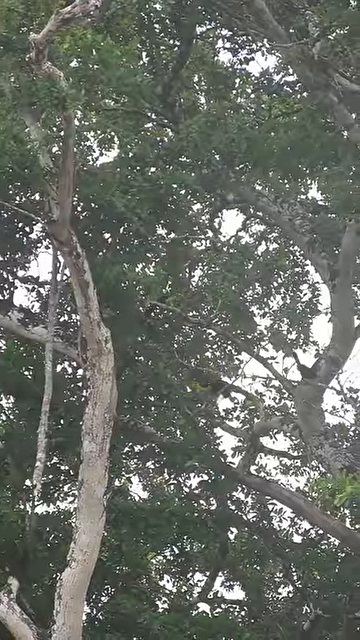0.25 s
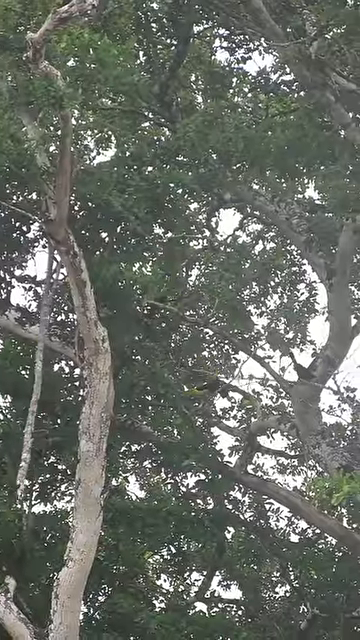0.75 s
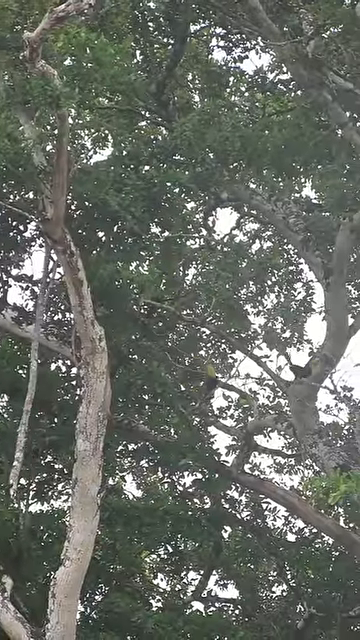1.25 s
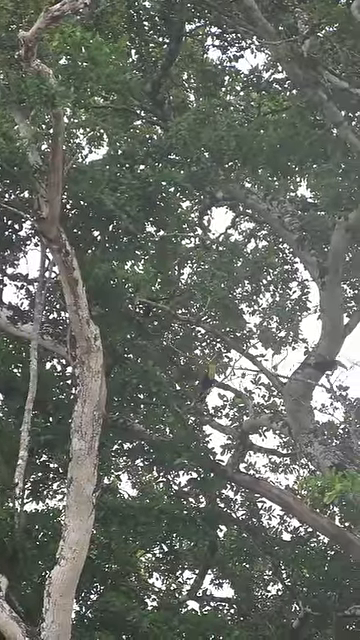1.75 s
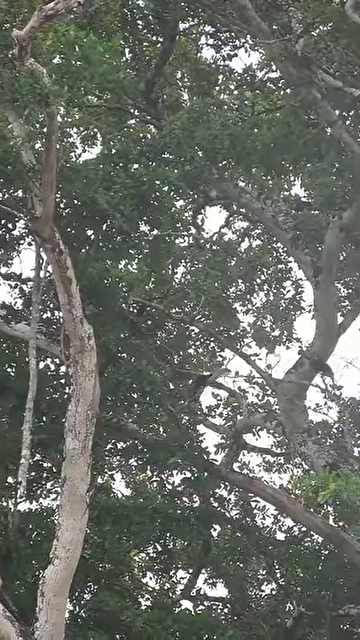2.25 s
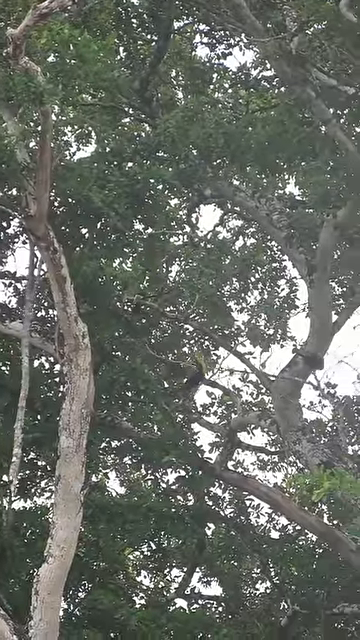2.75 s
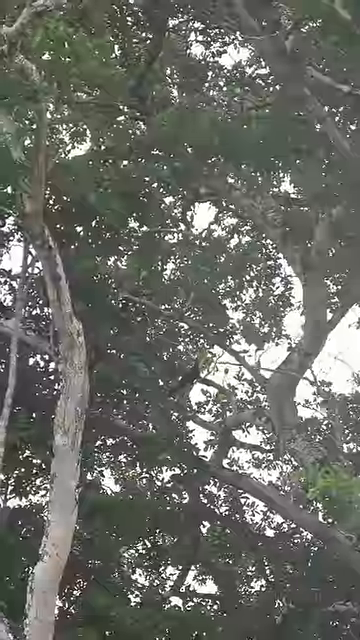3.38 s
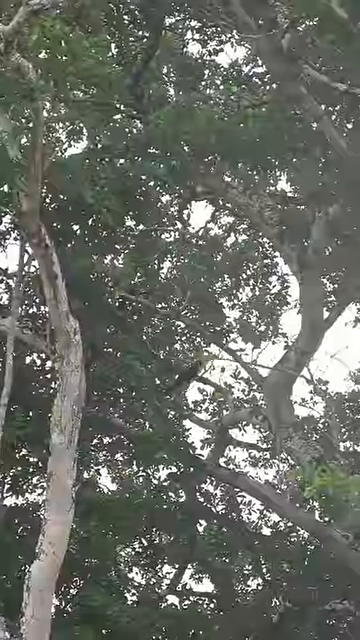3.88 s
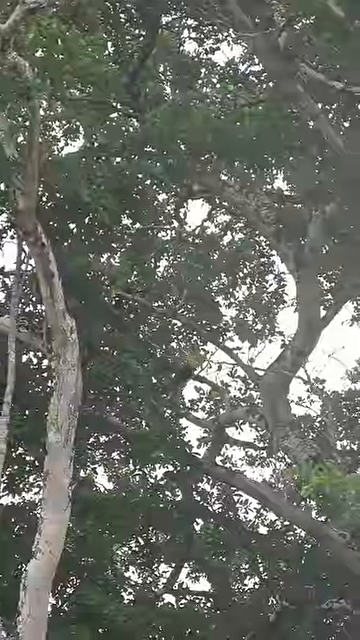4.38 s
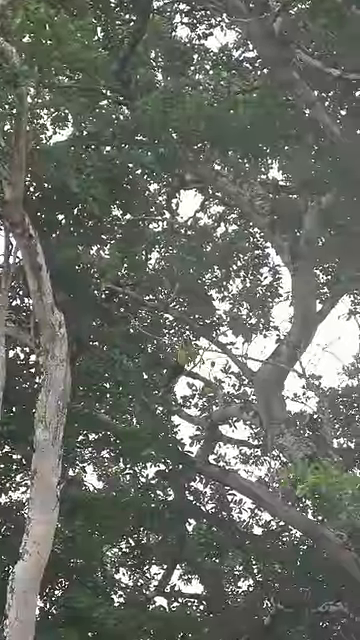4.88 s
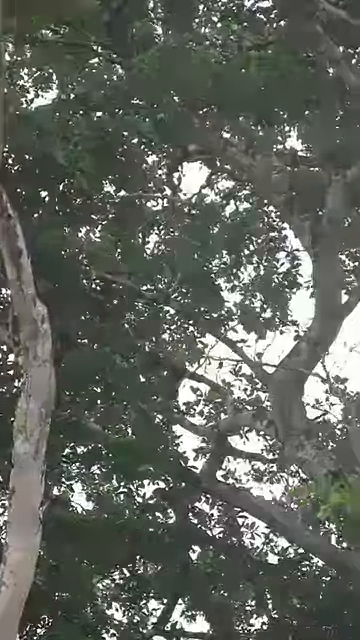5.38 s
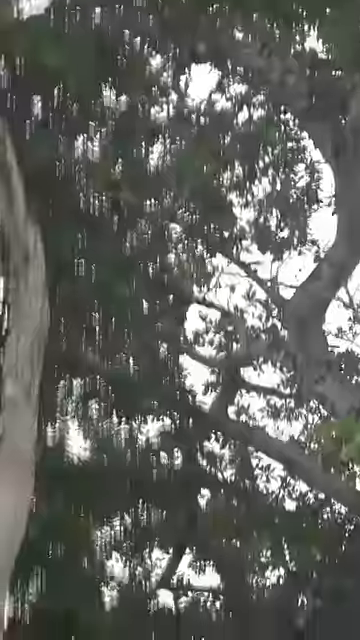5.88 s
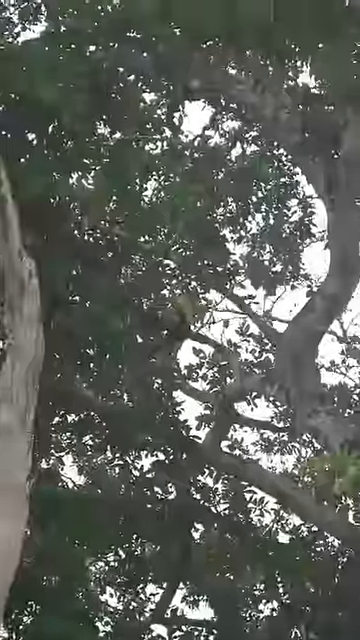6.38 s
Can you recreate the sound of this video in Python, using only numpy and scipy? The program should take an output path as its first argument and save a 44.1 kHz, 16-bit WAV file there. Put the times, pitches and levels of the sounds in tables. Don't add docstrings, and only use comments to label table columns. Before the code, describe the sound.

Several large tropical birds trade hoarse, rattling croaks high in a forest tree, over hiss and faint whistles; late handling clicks interrupt.

```python
import sys
import numpy as np
from scipy import signal
from scipy.fft import rfft, irfft, next_fast_len
from scipy.io import wavfile
from scipy.ndimage import uniform_filter1d, map_coordinates

SR = 44100
rng = np.random.default_rng(int(sys.argv[2]) if len(sys.argv) > 2 else 0)


def volts(x):
    e = np.asarray(x, float) / 20
    return 10 ** e


def dump(signal):
    limited = np.clip(np.atleast_2d(signal).T, -1, 1)
    pcm = np.round(limited * 32767).astype(np.int16)
    wavfile.write(sys.argv[1], SR, pcm)


N = 293246

# centre in Hz, width in Hz, level in dB.
SHELL = [(880, 720, -6), (1247, 63, 4), (1420, 96, 1), (1720, 420, 1.5), (2585, 88, 5), (3800, 3300, -3.5)]


def unit(x):
    return x / np.sqrt(np.mean(x ** 2) + 1e-20)


def along(points, hz):
    f, v = np.transpose(points)
    return np.interp(np.log(hz + 1), np.log(f + 1), v)


def curves(rows, t):
    s, *cols = np.transpose(rows)
    return [np.interp(t, s, c) for c in cols]


def wobble(rate_hz, size):
    knots = rng.standard_normal(int(size * rate_hz / SR) + 4)
    return map_coordinates(knots, [np.arange(size) * rate_hz / SR + 1])


def filtered(x, response):
    m = next_fast_len(x.shape[-1] + 8192)
    return irfft(rfft(x, m) * response(np.fft.rfftfreq(m, 1 / SR)), m)[..., :x.shape[-1]]


def modes(resonances):
    def response(f):
        total = 0
        for k, (centre_hz, width_hz, db) in enumerate(resonances):
            band = 1j * f * width_hz
            total = total + (-1) ** k * volts(db) * band / (centre_hz ** 2 - f * f + band)
        return total
    return response


def hiss(spectrum):
    return unit(filtered(rng.standard_normal(N), lambda hz: volts(along(spectrum, hz))))


def add(track, s, sound):
    part = track[..., max(round(s * SR), 0):][..., :sound.shape[-1]]
    part += sound[..., :part.shape[-1]]


def background():
    # Hz, dB per Hz; hiss alike in both ports, then opposite in them, then the chorus.
    air_mid = [(12, -46), (20, -8), (119, -7), (384, -4.5), (429, -3), (507, -6.5), (617, -4), (1880, -3.5),
               (2560, -6.5), (3670, -14), (6780, -13.5), (15600, -28.5)]
    air_side = [(12, -55), (20, -5), (537, -6), (671, -4.5), (1380, -8), (1680, -10), (2350, -12),
                (5280, -19), (15600, -34.5)]
    chorus_tone = [(2000, -21), (2500, 2.5), (3200, 1), (4100, 2), (4900, -12), (5600, -31)]
    # time in seconds, chorus level in dB.
    chorus = [(0, -48), (.3, -52), (.9, -54), (1.45, -51), (1.75, -51), (2.35, -51), (2.96, -47),
              (3.45, -59.5), (4.2, -56.5), (4.75, -58.5), (5.55, -65), (5.75, -52.5), (6.2, -51.5),
              (6.65, -53.5)]
    # centre in Hz, width in Hz, level in dB.
    insects = [(6800, 260, -67), (9300, 800, -67)]
    # mains line in Hz, level in dB rms.
    hum = [(59.2, -68), (118.4, -67), (600, -65.5)]
    t = np.arange(N) / SR
    chorus_db, = curves(chorus, t)
    mid = volts(-52.5) * hiss(air_mid)
    mid += volts(chorus_db + wobble(18, size=N)) * hiss(chorus_tone)
    for hz, width_hz, db in insects:
        band = filtered(rng.standard_normal(N), lambda f: np.exp(-((f - hz) / width_hz) ** 2))
        mid += volts(db) * unit(band)
    for hz, db in hum:
        phase = 2 * np.pi * hz * t + 0.34 * wobble(11, size=N)
        mid += volts(db + 0.41 * wobble(3.8, size=N)) * np.sin(phase)
    return mid, volts(-45.0) * hiss(air_side)


def train(first_s, last_s, db, hz, second_db, gap_s, voice, growth_ms=0):
    ms, start_pitch, third_db = voice
    count = round((last_s - first_s) / gap_s) + 1
    left = np.linspace(1, 0, count) if count > 1 else [0]
    scatter_db = 0.8 * rng.standard_normal((count, 3))
    notes = []
    for k, (u, c) in enumerate(zip(left, scatter_db)):
        s = last_s - u * (last_s - first_s)
        note_db = db - 2.5 * u ** 2 + c[0]
        note_ms = ms + growth_ms * (k + 1)
        notes.append((s, note_db, hz * start_pitch ** u, note_ms, second_db + 2 * c[1], third_db + 2 * c[2]))
    return notes


def low_notes():
    # first click in seconds, last click in seconds, held tone in ms, level in dB, pitch in Hz.
    croaks = [(0.417, 0.446, 50.5, -30, 1642), (0.969, .991, 50, -31, 1645), (1.254, 1.277, 9.5, -29, 1610),
              (1.544, 1.582, 10, -32, 1666), (1.597, 1.597, 23, -28.5, 1956),
              (1.817, 1.839, 30, -35.5, 1632), (2.08, 2.104, 55.5, -35, 1598), (2.43, 2.469, 3, -39, 1620),
              (2.636, 2.68, 56, -35, 1639), (3.042, 3.074, -10, -34, 1745), (3.199, 3.233, -9, -33, 1640),
              (3.756, 3.783, -1, -33.5, 1680), (3.814, 3.836, 27.5, -33, 1632),
              (4.332, 4.35, 42.5, -35.5, 1596), (4.928, 4.928, 50.5, -31.5, 1598),
              (5.517, 5.533, 10, -30.5, 1633), (6.024, 6.049, 70, -34, 1578),
              (6.591, 6.632, 11.5, -34, 1664)]
    # time in seconds, level in dB, pitch in Hz, 2nd overtone in dB.
    clucks = [(.008, -35.5, 1750, -20), (.032, -32.5, 1710, -23), (.107, -35.5, 1550, -20),
              (.398, -33.5, 1610, -12), (.554, -29.5, 1850, -20), (.732, -35, 1595, -28),
              (1.068, -28, 1767, -9), (1.35, -36, 1620, -5), (1.505, -38.5, 1650, 1),
              (3.101, -30, 1595, -17), (3.273, -30.5, 1650, -16), (3.341, -37, 1600, -6),
              (3.702, -34, 1660, -12), (3.915, -34.5, 1670, -3), (3.949, -36.5, 1750, -4),
              (4.877, -36.5, 1530, -11), (4.898, -37.5, 1750, 1), (1.192, -33, 1670, -2),
              (1.172, -39.5, 1570, 0), (0.429, -33.5, 1600, -21), (.585, -38, 1720, -1),
              (.603, -40, 1680, 1), (.626, -40, 1750, -15), (0.645, -34.5, 1800, -18),
              (.685, -34.5, 1940, -6), (1.644, -44, 1960, -12), (1.833, -35, 1720, -3),
              (1.863, -49, 1670, 1), (1.884, -38, 1650, -2), (1.908, -39, 1750, 2), (2.086, -40.5, 1720, 2),
              (2.104, -42, 1670, 2), (2.138, -36.5, 1590, -18), (1.816, -44, 1660, 2),
              (2.196, -36, 1960, -2), (4.417, -40, 1620, -10), (4.426, -37, 1620, -5),
              (4.436, -34, 1700, -7), (4.908, -34.5, 1800, 2.5), (5.453, -38, 1690, -3),
              (5.545, -33.5, 1580, -3), (6.175, -39, 1780, -2), (5.095, -53, 1540, -4),
              (5.484, -36, 1510, -29), (5.566, -31, 1947, -5), (5.609, -40, 1653, -10),
              (5.999, -43, 1570, 2), (6.069, -32, 1790, -1.5), (6.573, -41, 1610, -17)]
    # first note in seconds, last note in seconds, level in dB, pitch in Hz.
    shrill = [(0.383, .408, -48, 1720), (0.522, .547, -36.5, 1765), (1.191, 1.216, -42, 1650),
              (2.574, 2.574, -39.5, 1650), (3.231, 3.257, -37, 1768), (3.212, 3.212, -45.5, 1720),
              (3.762, 3.786, -48, 1840), (3.893, 3.893, -42.5, 1616), (6.112, 6.134, -53, 1580)]
    # note ms, first pitch over last, 3rd overtone dB
    click_voice, shrill_voice = (6, 0.97, -21), (11, 0.99, 0.99)
    click_gap_s, shrill_gap_s, hold_lag_s = 0.021, 0.024, 0.014
    notes = []
    for first_s, last_s, held_ms, db, hz in croaks:
        growth_ms = 0.03 * held_ms
        notes += train(first_s, last_s, db, hz * 0.98, -12.5, click_gap_s, click_voice, growth_ms)
        if held_ms > 10:
            middle_s = last_s + hold_lag_s + held_ms / 2000
            notes.append((middle_s, db - 2, hz, held_ms, -5, -15))
    for s, *note in clucks:
        notes += train(s, s, *note, click_gap_s, click_voice)
    for row in shrill:
        notes += train(*row, 3, shrill_gap_s, shrill_voice)
    return notes


def high_notes():
    # first note in seconds, last note in seconds, level in dB, pitch in Hz, 2nd overtone in dB.
    yelps = [(.052, .064, -35, 1974, -2.5), (0.653, 0.693, -38.5, 1932, 2.5), (1.079, 1.099, -35, 2070, 1),
             (1.125, 1.15, -38, 1900, -7), (1.22, 1.247, -36, 2035, -8), (1.286, 1.307, -34.5, 1850, -6),
             (1.318, 1.318, -41.5, 1950, 3), (2.449, 2.449, -42, 1894, -6), (2.469, 2.469, -40.5, 1800, -7),
             (1.525, 1.555, -40.5, 1882, -2), (1.865, 1.9, -40.5, 2260, -17), (1.863, 1.905, -37, 1845, -7),
             (1.914, 1.938, -32.5, 1920, -7), (2.18, 2.2, -36.5, 1960, -6), (2.489, 2.541, -33, 1895, -2.5),
             (2.758, 2.779, -37.5, 2000, -3), (3.111, 3.143, -34.5, 1980, -17),
             (3.081, 3.081, -39, 1900, -9), (3.167, 3.167, -36, 1950, -8), (3.194, 3.214, -38.5, 1910, -6),
             (3.241, 3.241, -34, 1860, -17), (3.27, 3.283, -35.5, 1916, -18),
             (3.295, 3.306, -40.5, 1940, -20), (3.762, 3.8, -36.5, 1955, -5.5),
             (3.872, 3.884, -35.5, 1970, -8), (3.918, 3.928, -37, 2080, -2.5),
             (4.451, 4.461, -33, 2032, -10), (4.813, 4.83, -42, 1918, -3.5), (5.0, 5.02, -39.5, 2024, -5),
             (5.447, 5.479, -36.5, 1920, -11), (6.132, 6.146, -35, 1980, -2)]
    gap_s, voice = 0.011, (7.5, 0.98, -25)
    return [note for row in yelps for note in train(*row, gap_s, voice)]


def syrinx(notes, glide, rough, flutter_hz, chop, rasp_db):
    # Hz, dB per Hz.
    throat = [(1280, -40), (1480, -1), (2050, 0), (2500, -8), (3400, -4), (4300, -5), (5400, -13),
              (7500, -34)]
    lean_s = 0.0015
    out, puffs = np.zeros(N), np.zeros(N)
    t = np.arange(-2600, 2600) / SR
    for s, db, hz, ms, second_db, third_db in notes:
        reach_s = max(ms, 5.5) * 0.00062
        late = np.clip(t / reach_s, -1, 1) * min(ms / 40, 1)
        leaned = t + lean_s / 2
        side_s = reach_s + lean_s * np.sign(leaned)
        swell = volts(db + late) * np.exp(-np.abs(leaned / side_s) ** (2 + ms / 18))
        turn = 2 * np.pi * hz * (t + glide * t * t / 2)
        turn = turn + rough * wobble(156.4, size=len(t)) + rng.uniform(0, 2 * np.pi)
        flutter = np.cos(2 * np.pi * flutter_hz * rng.uniform(0.87, 1.19) * t)
        jitter = wobble(322.4, size=len(t))
        chopped = (1 + 0.7 * flutter) * volts(4 * late)
        tone = (1 + chop * flutter) * np.sin(turn)
        tone += volts(second_db - 3.5) * chopped * np.sin(2 * turn + 0.39 * jitter)
        upper = np.sin(3 * turn + 0.9 * jitter) + 0.18 * np.sin(4 * turn)
        tone += volts(third_db - 2.5) * chopped * upper
        breath = volts(-ms * 0.09) * np.exp(-np.abs((t - 0.004) / (reach_s + 0.009)) ** 2) * chopped
        rasp = volts(db + rasp_db) * breath * rng.standard_normal(len(t))
        cut = max(-round((s + t[0]) * SR), 0)
        add(out, s + t[0], (swell * tone)[cut:])
        add(puffs, s + t[0], rasp[cut:])
    return out + filtered(puffs, lambda f: volts(along(throat, f)))


def forest(x):
    # Hz, t60 in seconds.
    decay = [(1700, 0.52), (4000, 0.46), (9000, 0.5)]
    rustle, rustle_hz, rise_s = 0.8, 600, 0.025
    out = np.zeros((2, N))
    step = SR // 3
    x = x * (1 + rustle * wobble(rustle_hz, size=N)) / np.hypot(1, rustle)
    for k in range(0, N, step):
        hz, t, z = signal.stft(rng.standard_normal((2, SR // 2)), SR, nperseg=256)
        fade = volts(-60 * t / along(decay, hz)[:, None]) * (1 - np.exp(-t / rise_s))
        tail = signal.istft(z * fade, SR, nperseg=256)[1]
        tail = tail / np.linalg.norm(tail[0])
        add(out, k / SR + 0.008, signal.fftconvolve(x[None, k:k + step], tail, axes=1))
    return out


def songbirds():
    # start in seconds, end in seconds, start pitch in Hz, end pitch in Hz, level in dB.
    whistles = [(0.19, 0.336, 2840, 2680, -54), (0.791, 0.91, 3310, 2910, -53.5),
                (0.895, 0.99, 2980, 2696, -52), (2.9, 3.04, 2800, 3240, -52),
                (1.393, 1.42, 4220, 4020, -40), (1.436, 1.472, 4050, 3950, -45),
                (1.487, 1.54, 2530, 2496, -49), (3.033, 3.085, 3435, 3430, -48),
                (3.348, 3.516, 3430, 3450, -50.5), (3.558, 3.698, 3440, 3370, -63),
                (3.559, 3.664, 2470, 2500, -51), (3.656, 3.74, 2676, 2700, -51),
                (4.25, 4.342, 2510, 2450, -59), (5.255, 5.46, 4150, 4126, -57),
                (5.637, 5.72, 3370, 3420, -52), (5.71, 5.745, 4000, 5520, -51.5),
                (5.735, 5.767, 5620, 5450, -55), (5.762, 5.79, 5600, 4600, -52.5),
                (5.75, 5.806, 4280, 3600, -49), (5.72, 5.783, 4700, 4650, -55),
                (6.337, 6.446, 3680, 3800, -71), (5.772, 5.86, 3030, 3010, -57),
                (6.61, 6.63, 4040, 4180, -60), (0.224, 0.31, 4070, 4050, -55.5),
                (5.806, 5.953, 4150, 4310, -50.5), (5.928, 6.065, 4293, 4280, -44.5),
                (5.945, 6.101, 4710, 4900, -55.5), (6.183, 6.283, 3720, 3640, -46),
                (6.21, 6.323, 3300, 3046, -49), (6.311, 6.475, 3070, 3020, -50),
                (6.457, 6.538, 3440, 3470, -48), (6.515, 6.57, 3500, 3560, -42),
                (6.572, 6.66, 3580, 3800, -51)]
    out = np.zeros(N)
    for start_s, end_s, start_hz, end_hz, db in whistles:
        u = np.linspace(0, 1, round((end_s - start_s) * SR))
        hz = start_hz + (end_hz - start_hz) * u + 35 * wobble(110, size=len(u))
        level = volts(db + 2 * wobble(60, size=len(u))) * np.sin(np.pi * u) ** 0.6
        add(out, start_s, level * np.sin(2 * np.pi * np.cumsum(hz) / SR))
    return out


def thud():
    # time in seconds, level in dB.
    smear = [
        (4.43, -55),
        (4.458, -36.5),
        (4.53, -39),
        (4.62, -48.5),
        (4.85, -61),
    ]
    # centre in Hz, width in Hz, level in dB.
    timber = [(90, 60, -12), (184, 26, 1), (430, 160, -3), (775, 90, 0), (1050, 200, -5), (1660, 300, -10),
              (2250, 200, -9)]
    rows = [(0, -120), (4.41, -120), *smear, (5.0, -75), (5.1, -120)]
    db, = curves(rows, np.arange(N) / SR)
    knocks = rng.standard_normal(N) * volts(0.68 * wobble(120, size=N))
    return volts(db + 1.0) * unit(filtered(knocks, modes(timber)))


def fingers():
    # time in seconds, peak in dB, t60 in seconds, snap above 4 kHz in dB, thump in dB.
    contacts = [
        (5.1622, -23, 0.035, -28, -27),
        (5.1659, -21, 0.05, -23.5, -30),
        (5.1764, -24, 0.036, -19, -35),
        (5.1863, -19.5, 0.024, -33, -35),
        (5.1883, -18, 0.016, -2, -24.5),
        (5.195, -25.5, 0.01, -23, -27),
        (5.262, -33, 0.22, -16, -15),
        (5.444, -28, 0.11, -22, -28),
        (5.683, -22, 0.0092, -48, -17.5),
        (5.687, -29, 0.01, -38, -26),
    ]
    out, t = np.zeros((2, N)), np.arange(4000) / SR
    for s, db, t60_s, snap_db, thump_db in contacts:
        a, b = rng.standard_normal((2, len(t))) * volts(-60 * t / t60_s)
        push = np.array([a + 0.59 * b, a - 0.45 * b])
        dull = min(snap_db + 22, 0) / 23 - 0.15
        ring = filtered(push, lambda f: modes(SHELL)(f) * (1 + (f / 2100) ** 6) ** dull)
        snap = filtered(push * volts(-60 * t / 0.005), lambda f: (f / 5500) ** 3 / (1 + (f / 5500) ** 5))
        thump = np.sin(2 * np.pi * 430 * t) * volts(thump_db + 4 - 60 * t / 0.044)
        ring = ring / np.abs(ring).max()
        snap = volts(snap_db) * snap / np.abs(snap).max()
        add(out, s, volts(db) * (ring + snap + thump))
    return out


def squeak():
    # time in seconds, slip rate in Hz, level in dB.
    slip = [
        (5.27, 367.5, -69),
        (5.3, 394.5, -54),
        (5.4, 410, -55.5),
        (5.47, 401, -53),
        (5.49, 403.5, -73),
    ]
    rows = [(0, 360, -120), (5.26, 360, -120), *slip, (5.5, 400, -120)]
    hz, db = curves(rows, np.arange(N) / SR)
    turn = 2 * np.pi * np.cumsum(hz + 5 * wobble(50, size=N)) / SR
    tone = np.sin(3 * turn) + 0.5 * np.sin(2 * turn) + 0.18 * np.sin(turn)
    tone += 0.47 * unit(filtered(rng.standard_normal(N), modes(SHELL[:2])))
    return volts(db + 4.5 + 1.4 * wobble(39.9, size=N)) * tone


def scene():
    mid, side = background()
    birds = syrinx(low_notes(), glide=0.8, rough=0.35, flutter_hz=100, chop=0.15, rasp_db=-2.5)
    birds += syrinx(high_notes(), glide=3.4, rough=0.6, flutter_hz=110, chop=0.3, rasp_db=2)
    whistles = songbirds()
    wet_mid, wet_side = forest(volts(-4) * birds) + forest(whistles)
    mid = mid + birds + whistles + wet_mid + thud() + squeak()
    side = side + volts(-15.5) * wet_side - volts(-20.0) * birds
    side = side + volts(-16.0) * np.imag(signal.hilbert(birds))
    return np.array([mid + side, mid - side]) + fingers()


def suppressor(mid):
    # time in seconds, mean cut in dB, patchiness in dB.
    duck = [
        (5.12, -1, -0.5),
        (5.15, -18, -7),
        (5.2, 0, 1),
        (5.23, -11, 7),
        (5.3, -4.5, 6),
        (5.39, -11, 9),
        (5.45, 3.5, 6),
        (5.52, -10, 13),
        (5.575, -10, 0),
        (5.6, -1.5, -1),
    ]
    # cut in dB, patchiness in dB.
    idle = (-.5, 1)
    # Hz, share of patchiness.
    spared = [(1700, 0.19), (2700, -0.35), (4300, -0.28), (6000, 0.51), (7700, -0.72), (9400, 1),
              (12700, -0.81), (14500, -0.32)]
    # start in seconds, end in
    # seconds, low edge in Hz, high edge in Hz.
    shut = [(5.22, 5.24, 3450, 3850), (5.22, 5.42, 2170, 2330), (5.22, 5.24, 2850, 3050),
            (5.36, 5.405, 2800, 3600), (5.31, 5.36, 2650, 2800), (5.5, 5.56, 2250, 2850),
            (5.245, 5.42, 6150, 6400), (5.36, 5.405, 5750, 6150), (5.22, 5.26, 7800, 8400),
            (5.245, 5.4, 6950, 7500), (5.26, 5.52, 7750, 8150), (5.36, 5.45, 7200, 8200),
            (5.515, 5.57, 6700, 9000), (5.47, 5.585, 6200, 6450), (5.5, 5.55, 5400, 5900),
            (5.245, 5.29, 13200, 14500), (5.245, 5.57, 12300, 12950), (5.29, 5.335, 11700, 12300),
            (5.48, 5.585, 10350, 12300), (5.52, 5.57, 9850, 10350), (5.5, 5.585, 13000, 16000),
            (5.82, 5.93, 4430, 4590), (5.93, 6.02, 4830, 4970)]
    hz, t, z = signal.stft(mid, SR, nperseg=1024)
    cut_db, patchy_db = curves([(5.08, *idle), *duck, (5.64, *idle)], t)
    field = uniform_filter1d(rng.standard_normal(z.shape), size=5, axis=0)
    field = unit(uniform_filter1d(field, size=13, axis=1))
    patches = 1.33 * field + along(spared, hz)[:, None]
    gain = volts(np.minimum(cut_db + patchy_db * patches, 1))
    for start_s, end_s, lo_hz, hi_hz in shut:
        during = (t > start_s - 0.008) & (t < end_s + 0.008)
        gain[(hz >= lo_hz) & (hz <= hi_hz)] *= np.where(during, 0.01, 1)
    usual = np.median(np.abs(z), axis=1, keepdims=True)
    strong = 1 / (1 + (4.0 * usual / (np.abs(z) + 1e-9)) ** 4)
    reach = 1 / (1 + (1250 / (hz[:, None] + 1)) ** 10)
    return signal.istft(z * (1 - reach * (1 - strong) * (1 - gain)), SR, nperseg=1024)[1][:N]


def band_limit(x):
    return signal.sosfilt(signal.butter(12, 15800, fs=SR, output="sos"), x)


def record(dry):
    mid, side = (dry[0] + dry[1]) / 2, (dry[0] - dry[1]) / 2
    mid = suppressor(mid)
    mix = filtered(np.array([mid + side, mid - side]), lambda f: f < 15780)
    return band_limit(mix)


dry = scene()
out = record(dry)
dump(out)
```